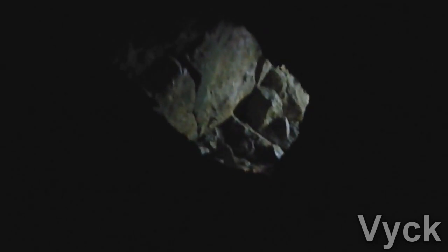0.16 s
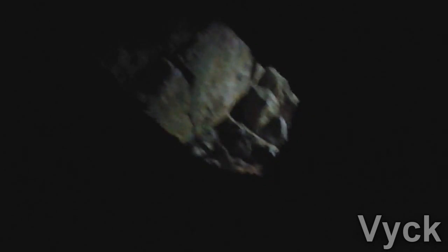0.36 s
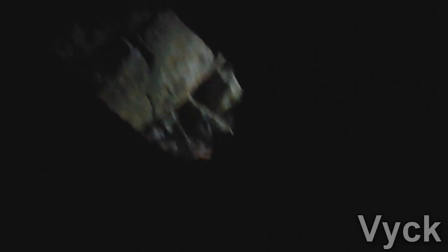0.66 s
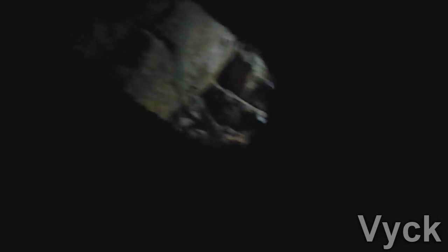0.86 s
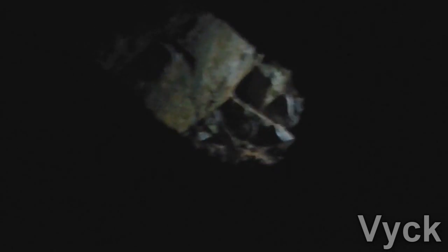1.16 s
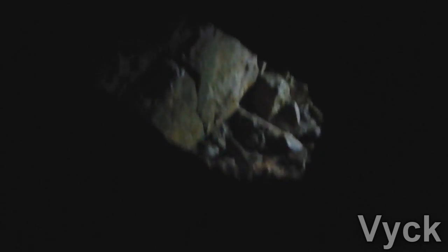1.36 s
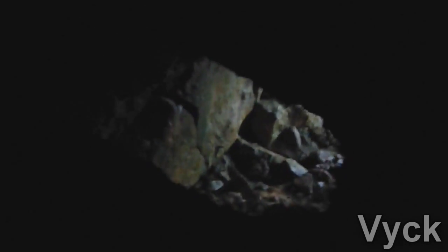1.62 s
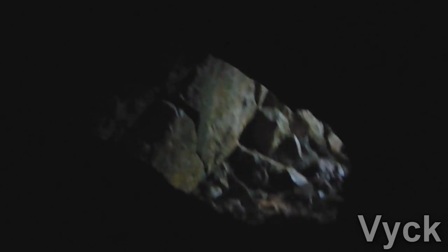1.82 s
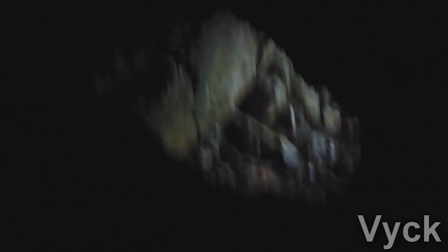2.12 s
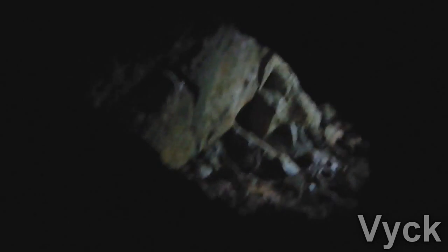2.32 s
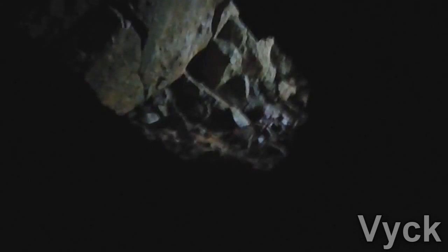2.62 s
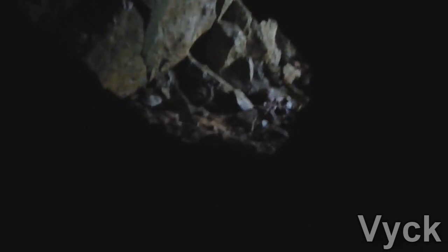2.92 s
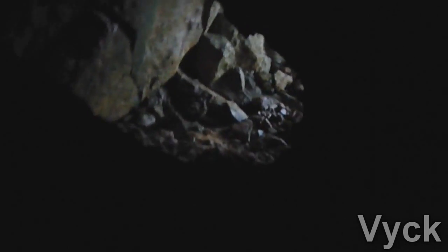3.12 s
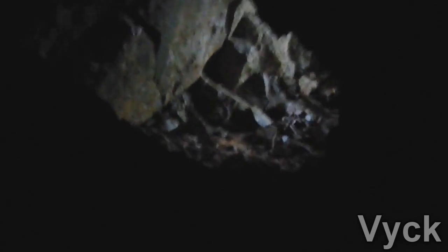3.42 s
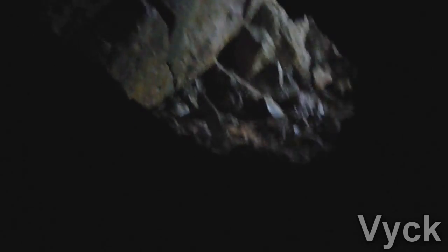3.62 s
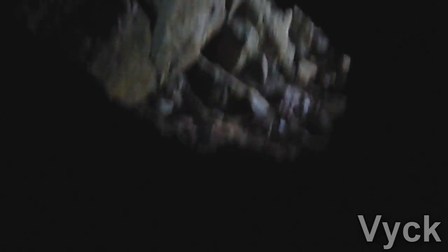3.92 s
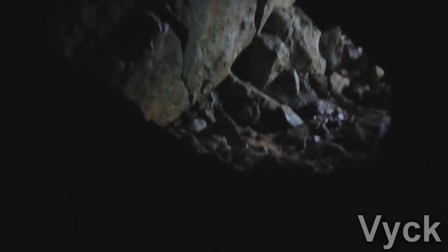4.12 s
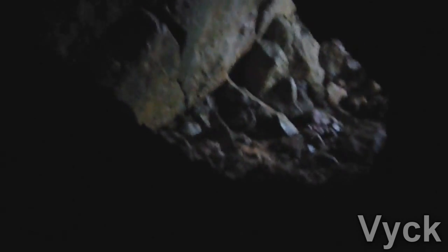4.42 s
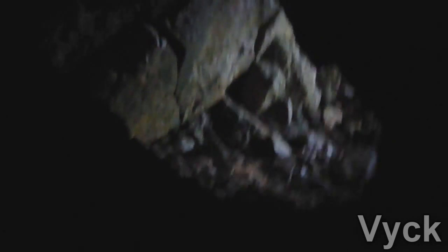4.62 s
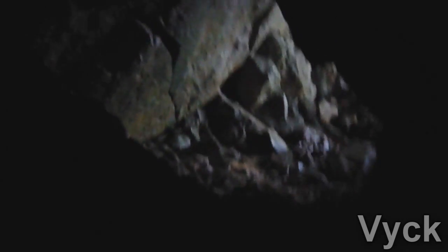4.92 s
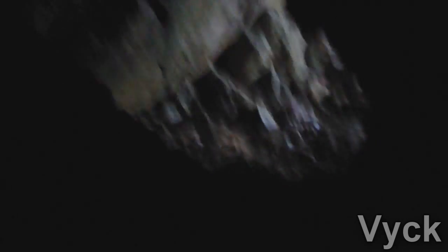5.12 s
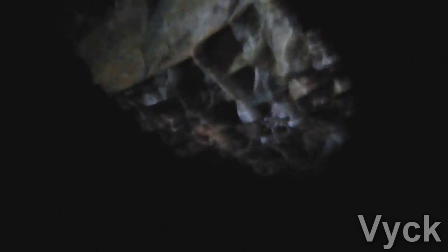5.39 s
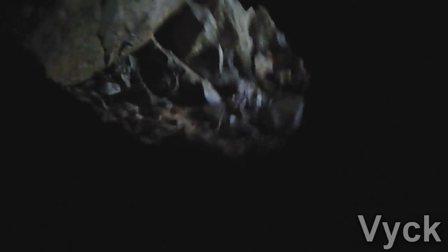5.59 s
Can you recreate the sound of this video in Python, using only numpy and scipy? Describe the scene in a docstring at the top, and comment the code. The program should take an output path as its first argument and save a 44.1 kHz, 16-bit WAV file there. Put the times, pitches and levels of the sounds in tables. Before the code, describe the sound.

Boots tread on loose broken rock in a narrow mine tunnel. Hiss comes first with two tiny dropouts, then soft knocks and a hard burst around one second. Quieter grinding follows, then dense stone clatter from two and a half seconds, thinning after four and bursting again at the end. Close rock walls add very short tails; the small camera microphone sounds dull, with clipped peaks.

```python
"""Boots on loose broken rock in a narrow tunnel, heard by a hissing small camera with little above 4 kHz.
Two very brief near-silences in the hiss come first, then soft knocks and a burst of hard ones up to 1.3 s.
Quieter grinding follows; from 2.5 s stones knock thickly, thin out after 4.3 s and burst again from 5.1 s.
Knocks are short rings with clattering chips, crunches are clumps of grit grains, thuds are low notes.
The rock walls answer at once with short noise tails; a steady offset remains and the peaks are clipped."""
import sys
import numpy as np
from scipy import signal
from scipy.fft import rfft, irfft, next_fast_len
from scipy.io import wavfile
from scipy.ndimage import map_coordinates

SR = 44100
rng = np.random.default_rng(int(sys.argv[2]) if len(sys.argv) > 2 else 0)


def to_wav(sig):
    """Store sig (one row per channel, or 1-D mono) as 16-bit WAV at the path in sys.argv[1].

    Samples outside -1..1 are clipped; the rate is SR.
    """
    pcm = np.clip(np.atleast_2d(sig), -1, 1) * 32767
    pcm = np.round(pcm).astype(np.int16)
    wavfile.write(sys.argv[1], SR, pcm.T)  # frames by channels


def how_loud(loudness_db):
    """Turn decibels into a plain amplitude multiplier (0 dB gives 1, 20 dB gives 10)."""
    steps = np.asarray(loudness_db, float) / 20
    return 10 ** steps


N = 253575  # length of the scene in samples


def unit(x):
    """Scales a sound to an rms of 1."""
    return x / np.sqrt(np.mean(x ** 2) + 1e-20)


def along(points, hz):
    """Reads a table of (frequency, value) at any frequency, on a log axis."""
    f, value = np.transpose(points)
    return np.interp(np.log(hz + 1), np.log(f + 1), value)


def filtered(x, response):
    """Multiplies the spectrum of x by a response, which may be complex."""
    m = 2 * next_fast_len(N // 2 + SR // 4)  # spare room keeps the end from wrapping to the start
    return irfft(rfft(x, m) * response(np.fft.rfftfreq(m, 1 / SR)), m)[:N]


def wobble(rate):
    """A smooth random curve through `rate` random points a second."""
    points = rng.standard_normal(int(N * rate / SR) + 4)
    return map_coordinates(points, [np.arange(N) * rate / SR])


# colour of the camera's hiss, relative: (frequency [Hz], level [dB per Hz])
HISS_COLOUR = [(40, 3), (80, -10), (300, -16), (450, -12.5), (700, -10), (1000, -23), (3000, -21.5),
               (5000, -19)]


def hiss():
    """The camera's own noise: coloured random noise whose level wavers a little."""
    noise = filtered(rng.standard_normal(N), lambda hz: how_loud(along(HISS_COLOUR, hz)))
    return how_loud(-45 + 0.92 * wobble(17)) * unit(noise)


# how long the rock walls keep answering: (frequency [Hz], time to fall 60 dB [s])
WALL_DECAY = [(200, 0.26), (1000, 0.11), (4000, 0.068)]


def tunnel(x):
    """The walls return a short tail of dying noise, drawn anew every 1/3 s as the walker moves."""
    out = np.zeros(N + 2 * SR)
    step, delay = SR // 3, SR // 300  # samples; the answer starts 1/300 s late
    for start in range(0, N, step):
        hz, t, z = signal.stft(rng.standard_normal(step), SR, nperseg=256)
        decay = how_loud(-60 * t / along(WALL_DECAY, hz)[:, None])
        tail = signal.istft(z * decay, SR, nperseg=256)[1]
        answer = signal.fftconvolve(x[start:start + step], tail / np.linalg.norm(tail))
        out[start + delay:][:len(answer)] += answer
    return out[:N]


# big slabs shifting with a dull note: (time [s], level [dB], pitch [Hz])
SLAB_THUDS = [(.635, -26.5, 188), (1.011, -27, 489), (1.018, -29, 330), (1.312, -28.5, 146),
              (1.589, -27.5, 496), (1.607, -25, 142), (1.92, -26, 160), (2.182, -34, 494),
              (2.528, -21, 330), (2.547, -16.5, 246), (2.676, -29, 263), (3.131, -33.5, 400),
              (3.421, -27.5, 225), (4.147, -27.5, 570), (4.257, -27, 152.5), (4.343, -24.5, 182),
              (4.87, -27.5, 155), (5.157, -19, 527), (5.174, -14, 287), (5.253, -23.5, 310),
              (5.393, -24, 310), (5.606, -26, 462), (5.617, -24.5, 240), (5.641, -18.5, 146),
              (5.666, -22.5, 578)]


def thuds():
    """A slab takes the weight softly: one low note that swells and dies at once."""
    out, t = np.zeros(N + SR), np.arange(SR // 4) / SR
    swell = how_loud(-60 * t / 0.054) * (1 - np.exp(-t / 0.002))  # falls 60 dB in 0.054 s, rises in about 2 ms
    swell /= swell.max()
    for s, db, hz in SLAB_THUDS:
        note = np.sin(2 * np.pi * (hz * t + rng.random()))
        out[round(s * SR):][:len(t)] += how_loud(db) * swell * note
    return out[:N]


# colour of stone rubbing on stone, relative: (frequency [Hz], level [dB per Hz])
GRIT_COLOUR = [(300, -21.5), (600, -20.5), (1000, 6.5), (1500, -0.5), (2500, 3), (3500, -5), (5000, -2)]


def grit_colour(hz):
    """Broken rock rubs with most of its power around 1 kHz; gives dB at each frequency."""
    return along(GRIT_COLOUR, hz)


# low resonances of the rubble under the sole: (pitch [Hz], width [Hz], relative level [dB])
RUBBLE_BED = [(150.6, 44, -0.5), (282, 90, -1.5), (410, 286, -6)]


def bed(hz):
    """The rubble bed responds as a few broad resonances, added with alternating sign."""
    total = 0
    for k, (centre, width, db) in enumerate(RUBBLE_BED):
        damping = 1j * hz * width
        total = total + (-1) ** k * how_loud(db) * damping / (centre ** 2 - hz ** 2 + damping)
    return total


def grains(centre_hz, spread, cycles, uneven_db, count):
    """Tiny damped rings at random moments, a few much bigger than the rest."""
    at, tune, size = rng.random(count), rng.standard_normal(count), rng.exponential(size=count)
    hz = np.clip(centre_hz * np.exp(spread * tune), 200, 6000)[:, None]
    t = np.arange(256) / SR
    rings = np.exp(-t * hz / cycles) * np.sin(2 * np.pi * hz * t)
    rings *= how_loud(uneven_db * size)[:, None] * np.sqrt(hz)  # high rings are shorter, so make them stronger
    index = (at * N).astype(int)[:, None] + np.arange(len(t))
    return unit(np.bincount(index.ravel(), rings.ravel(), N + len(t))[:N])


# a boot grinds into the rubble; swell and fade span 20 dB before pressure() shortens them:
# (peak time [s], grit level [dB], swell [s], fade [s], thud level against the grit [dB])
BOOT_CRUNCHES = [(.269, -47, .012, 0.24, -11), (.341, -39.5, 0.04, 0.047, -10),
                 (.641, -30, 0.031, 0.35, -11), (.83, -23, 0.22, 0.22, -11.5), (1.02, -31, .03, 0.11, -1.5),
                 (1.056, -19, 0.039, 0.096, -8.5), (1.148, -23, 0.16, 0.24, -14),
                 (1.297, -32.5, .2, 0.091, -6), (1.464, -37, .15, 0.076, -16),
                 (1.59, -30.5, 0.19, 0.17, -8), (1.732, -38, 0.18, 0.17, -13.5),
                 (1.84, -32, .05, .4, -17.5), (1.917, -33, 0.18, .4, -6), (2.05, -34.5, 0.37, 0.27, -22),
                 (2.189, -25.5, 0.16, 0.26, -8.5), (2.373, -38.5, .15, 0.087, 1),
                 (2.468, -37, 0.19, 0.11, -5), (2.532, -18.5, 0.0061, 0.22, -10),
                 (2.546, -19.5, 0.017, 0.045, -8), (2.638, -20, .15, 0.32, -15),
                 (2.776, -24, 0.22, 0.052, -15), (2.875, -23.5, 0.06, 0.16, -10.5),
                 (3.101, -18, 0.17, 0.36, -16.5), (3.287, -24, .25, .3, -13.5),
                 (3.455, -19, 0.25, 0.22, -15.5), (3.66, -31, 0.49, .5, -13), (3.842, -31, .4, 0.69, -9),
                 (4.071, -27.5, 0.11, 0.22, -13), (4.158, -25, .02, 0.36, -10),
                 (4.352, -32, 0.14, 0.25, -8.5), (4.558, -38, 0.26, 0.41, -15),
                 (4.699, -35.5, 0.59, 0.15, -5.5), (4.783, -28.5, 0.064, 0.072, -19),
                 (4.879, -34.5, 0.16, .2, -5), (5.025, -38.5, .1, .3, -12),
                 (5.083, -26.5, 0.0052, 0.17, -21.5), (5.158, -25, 0.023, 0.091, -4.5),
                 (5.19, -20.5, 0.12, 0.32, -5.5), (5.393, -16.5, 0.08, 0.18, -11.5),
                 (5.6, -17, 0.25, 0.47, -9.5)]


def pressure():
    """Boot weight: each crunch swells to a peak and fades; gives grit and thud levels in dB."""
    t = np.arange(N) / SR
    grit_power, thud_power = how_loud(2 * -50.5), how_loud(2 * -64.5)  # while the boots stand still
    for s, db, swell, fade, thud in BOOT_CRUNCHES:
        fall_db = 20 * np.abs(t - s) / np.where(t < s, swell, fade)
        grit_power = grit_power + how_loud(2 * (db - fall_db / 0.84))  # 0.84 of the table's times
        thud_power = thud_power + how_loud(2 * (db + thud - fall_db / 0.83))
    return 10 * np.log10(grit_power), 10 * np.log10(thud_power)


# fine grit underfoot, before the weight of the thud shifts it: (time [s], level [dB])
FINE_GRIT = [(0, -9.5), (.6, -9), (1.0, -10.5), (1.16, -8.5), (1.3, -13), (1.6, -13.5), (1.75, -5),
             (1.92, -12.5), (2.1, -8), (2.4, -7.5), (2.7, -6.5), (2.95, -12.5), (3.3, -8.5), (3.9, -5.5),
             (4.15, -10.5), (4.45, -6), (4.801, -5), (5.03, -4.5), (5.15, -10), (5.45, -7), (5.75, -11.5)]


def tread():
    """Coarse and fine grit grind in clumps under the sole, and the weight shakes the bed."""
    grit_db, thud_db = pressure()
    fine_db = np.interp(np.arange(N) / SR, *np.transpose(FINE_GRIT))
    fine_db = np.clip(fine_db - 0.3 * (thud_db - grit_db), -14, 1.5)  # heavier thud, coarser grit
    clumps = 1.14 * wobble(35) + 1.3 * wobble(110)  # dB
    coarse = grains(1098, 0.32, cycles=2.9, uneven_db=2.5, count=9000) * how_loud(1.52 * wobble(40))
    fine = grains(2573, 0.41, cycles=1.77, uneven_db=2.5, count=12000) * how_loud(1.8 * wobble(40))
    rub = unit(filtered(rng.standard_normal(N), lambda hz: how_loud(grit_colour(hz))))
    grit = how_loud(-8.5 - 0.43 * fine_db) * coarse
    grit += how_loud(fine_db - 2.0) * fine
    grit += how_loud(-3.5) * rub
    shaking = rng.standard_normal(N) * how_loud(2.5 * wobble(25) + 0.47 * clumps)
    thud = unit(filtered(shaking, bed))
    return how_loud(grit_db + clumps) * grit + how_loud(thud_db) * thud


def clatter(hz, t60, rise):
    """Chips of rock: noise coloured around one pitch that swells and falls 60 dB in t60 seconds."""
    t = np.arange(SR // 8) / SR
    f = np.fft.rfftfreq(len(t), 1 / SR)
    colour = how_loud(0.54 * grit_colour(f)) / np.sqrt(1 + (np.log((f + 1) / hz) / 0.54) ** 2)
    chips = unit(irfft(rfft(rng.standard_normal(len(t))) * colour, len(t)))
    return how_loud(-8) * chips * how_loud(-60 * t / t60) * (1 - np.exp(-t / rise))


# stones sliding off each other:
# (time [s], strength [dB], pitch [Hz], time to fall 60 dB [s], rise [s])
STONE_SLIDES = [(0.8177, -15, 1430, 0.042, 0.0054), (0.853, -14, 1420, .055, .0062),
                (1.0626, 1, 960, 0.036, .0027), (1.1083, -9, 2660, .039, 0.0015),
                (1.59, -16.5, 960, 0.03, 0.0035), (2.1335, -13, 2040, 0.034, 0.0017),
                (2.183, -20, 935, .03, .0024), (2.363, -15, 1680, 0.066, .0046),
                (2.5497, -4.5, 1015, 0.065, 0.0024), (2.887, -7, 1540, .025, 0.0027),
                (3.9261, -9, 950, .065, 0.0027), (4.1956, -2.5, 2940, 0.028, 0.0019),
                (4.2807, -10, 2780, .052, 0.0033), (4.3453, -8, 1000, .034, 0.0044),
                (4.7682, -8, 1230, 0.047, 0.0037), (4.824, -10, 2360, 0.032, 0.0023),
                (5.024, -20, 2480, 0.036, 0.007)]


def slides():
    """Stones slide off each other: a swell of chips with no ring."""
    out = np.zeros(N + SR)
    for s, db, hz, t60, rise in STONE_SLIDES:
        chips = clatter(hz, t60, rise)
        out[round(s * SR):][:len(chips)] += how_loud(db) * chips
    return out[:N]


def ring(hz):
    """Two struck stones ring for a few cycles, each at its own pitch; the peak is 1."""
    t = np.arange(SR // 8) / SR
    partner = hz * rng.uniform(0.62, 1.0)  # the other stone is lower
    pair = np.sin(2 * np.pi * hz * t) * np.exp(-t * hz / 2.07)
    pair += 0.39 * np.sin(2 * np.pi * partner * t) * np.exp(-t * partner / 1.2)
    pair *= 1 - np.exp(-t * hz / 0.3)  # the contact takes part of a cycle to build up
    return pair / np.abs(pair).max()


# stones knocking together:
# (time [s], strength [dB], pitch [Hz], clatter's time to fall 60 dB [s], ring against strength [dB])
STONE_KNOCKS = [(.2667, -25, 1520, 0.048, -7), (0.3302, -24.5, 1420, .033, -5.5),
                (.555, -32, 1290, 0.036, 0), (0.644, -17.5, 1020, 0.04, -18),
                (0.7438, -10.5, 1140, 0.04, -5), (0.783, -10, 1450, 0.059, -2.5),
                (0.8142, -6, 1680, 0.049, 2), (1.0171, -14.5, 706, 0.015, 0.5),
                (1.0459, -6, 900, 0.054, -4.5), (1.1743, -11, 1870, .026, -4), (1.2629, -8, 970, 0.029, -3),
                (1.299, -16.5, 790, 0.037, -3.5), (1.902, -20, 860, .014, -0.5),
                (2.4841, -23, 1630, .029, -1.5), (2.529, -9.5, 970, 0.032, 1),
                (2.5379, -12.5, 1670, .026, -2.5), (2.6038, -8, 2470, 0.019, 0.5),
                (2.6175, -0.5, 1670, .019, -15), (2.6342, -18, 1010, .017, 3.5),
                (2.6823, -10, 2650, 0.032, -5), (2.7631, -20, 860, 0.016, 4.5),
                (2.83, -21, 1640, .019, 4.5), (2.869, -8, 3210, .017, -8.5), (2.878, -2.5, 3300, 0.022, -8),
                (2.92, -13, 1480, .015, 4.5), (3.1136, -4, 1800, 0.02, -1.5), (3.151, -7, 1140, 0.026, -7),
                (3.1999, -15, 980, .023, -18), (3.255, -11.5, 1176, 0.02, -4.5),
                (3.282, -8, 2310, 0.057, -4), (3.296, -4.5, 2220, 0.015, -19),
                (3.369, -16.5, 1185, 0.017, -1.5), (3.3817, -7, 1130, 0.045, -4),
                (3.4194, -4.5, 3130, .017, -8), (3.4459, -4, 1020, 0.021, -5),
                (3.5148, -17, 2180, 0.013, 2), (3.525, -8.5, 2230, .018, -0.5), (3.5666, -12, 1530, .02, 0),
                (3.603, -15.5, 3150, .042, 2.5), (3.717, -11, 2210, 0.035, -14),
                (3.7378, -17.5, 2220, 0.035, -2.5), (3.758, -12, 2960, 0.021, -5.5),
                (3.817, -17.5, 2660, .017, 0), (3.8565, -10.5, 930, 0.053, -9.5),
                (3.8857, -3.5, 2885, .02, 3), (4.1541, -1.5, 1720, 0.011, 0.5),
                (4.239, -17.5, 1010, 0.018, -5.5), (4.3389, -7.5, 2680, 0.044, -6),
                (4.4616, -16, 3130, 0.034, -14.5), (4.7872, -17, 1260, 0.039, -5),
                (4.8687, -15.5, 1110, 0.018, -1.5), (5.0182, -11.5, 2260, 0.047, -3),
                (5.075, -5.5, 2060, 0.036, -8.5), (5.181, -9.5, 1150, 0.023, -0.5),
                (5.3067, -10, 2100, .027, -15), (5.3445, -14.5, 1180, 0.03, -2),
                (5.375, -2, 1574, 0.047, -6.5), (5.408, -2.5, 1030, 0.041, -6.5),
                (5.429, -5.5, 1120, 0.032, -6.5), (5.482, -15.5, 1080, 0.023, 0),
                (5.646, -22, 880, .014, 3.5)]


def knocks():
    """A knock rings briefly while chips, starting almost at once, clatter on around the same pitch."""
    out = np.zeros(N + SR)
    for s, db, hz, t60, ring_db in STONE_KNOCKS:
        knock = how_loud(ring_db) * ring(hz) + clatter(hz, t60, rise=0.0013)
        out[round(s * SR):][:len(knock)] += how_loud(db) * knock
    return out[:N]


def scene():
    """Rubble underfoot, the walls' answer to it and the hiss."""
    rubble = thuds() + tread() + slides() + knocks()
    return (hiss() + how_loud(-13.5) * tunnel(rubble) + rubble)[None]


def causal(gain):
    """The same gain with the phase of a real filter, so that nothing sounds before a blow."""
    cepstrum = irfft(np.log(gain))
    half = len(cepstrum) // 2
    cepstrum[1:half] *= 2
    cepstrum[half + 1:] = 0
    return np.exp(rfft(cepstrum))


# what the camera's microphone lets through: (frequency [Hz], gain [dB])
MICROPHONE_GAIN = [(30, -19), (60, -7.5), (120, 0.5), (3300, 1.5), (3900, -6.5), (4700, -15), (5020, -23.5),
                   (5250, -41.5), (7000, -80.5)]


def microphone(x):
    """A narrow microphone weakens the lowest bass and nearly everything above 4 kHz."""
    return filtered(x, lambda hz: causal(how_loud(along(MICROPHONE_GAIN, hz))))


# moments when the sound nearly vanishes: (middle [s], length [s])
BRIEF_SILENCES = [(0.193, 0.0095), (0.251, 0.0047)]


def silences(x):
    """The level dips briefly to a twentieth, with steep slopes on both sides."""
    t = np.arange(N) / SR
    for s, length in BRIEF_SILENCES:
        outside = np.abs(t - s) - length / 2  # seconds from the edge of the silence
        x = x * np.clip(outside / 0.00069, .05, 1)
    return x


def low_pass(x):
    """Removes everything above the highest recorded frequency."""
    return signal.sosfilt(signal.butter(12, 12300, fs=SR, output="sos"), x)


def record(dry):
    """The microphone, the brief silences, a steady offset and hard clipping of the peaks."""
    heard = silences(microphone(dry[0]))
    mix = np.clip(heard - 0.0662, -.96, .96)
    return low_pass(mix[None])


dry = scene()
out = record(dry)
to_wav(out)
```